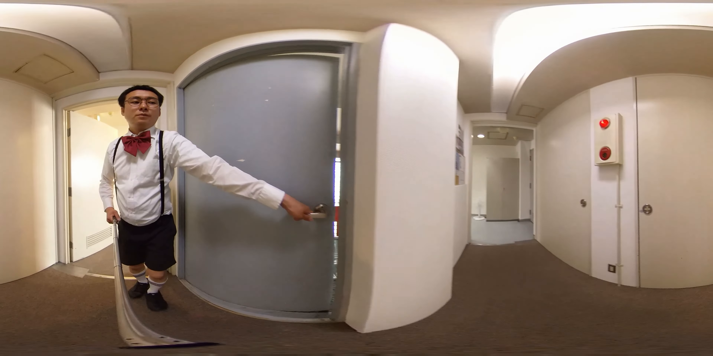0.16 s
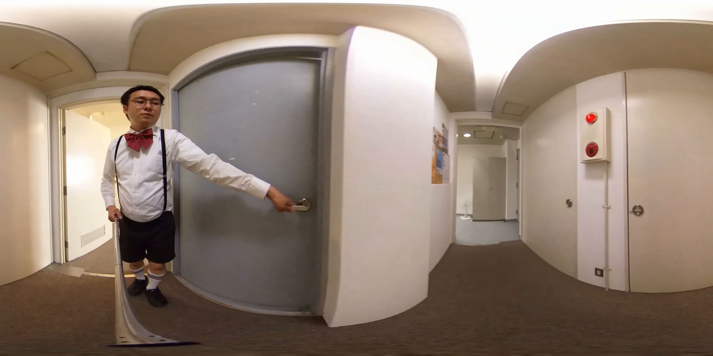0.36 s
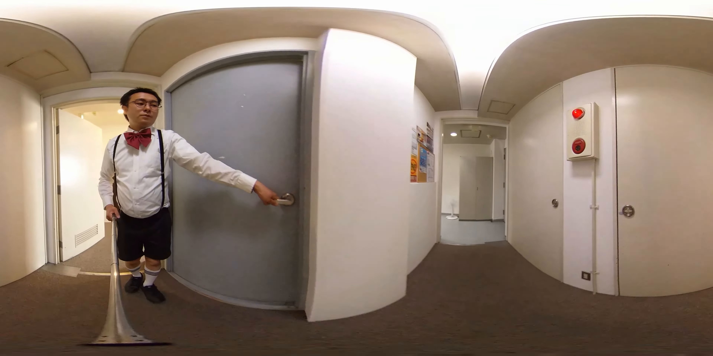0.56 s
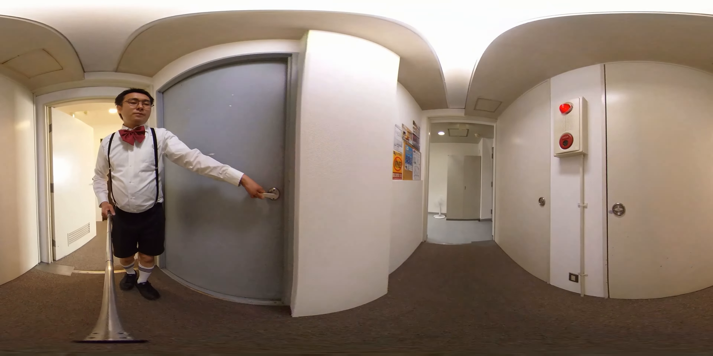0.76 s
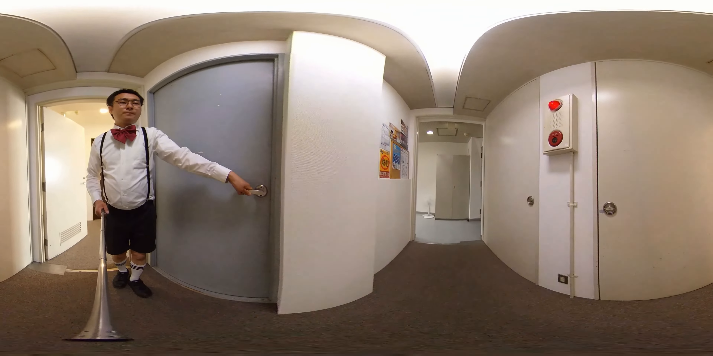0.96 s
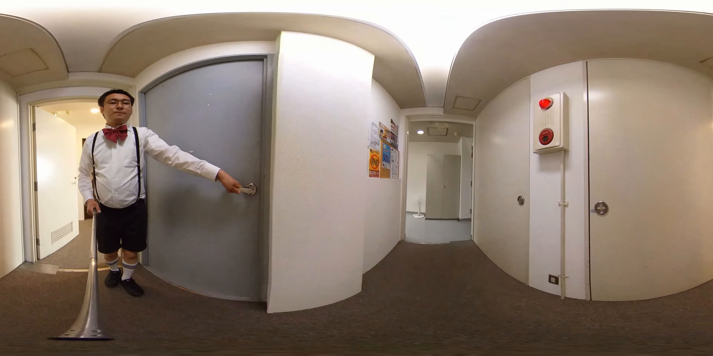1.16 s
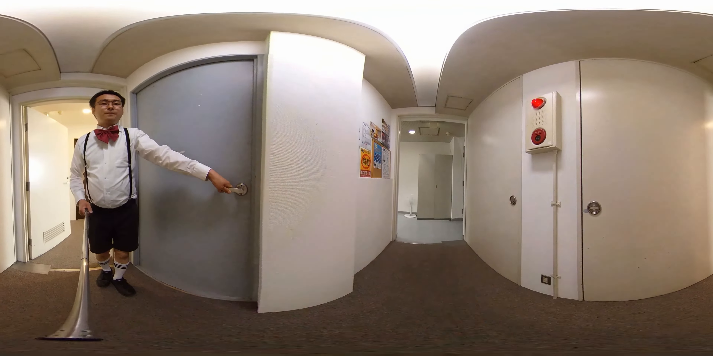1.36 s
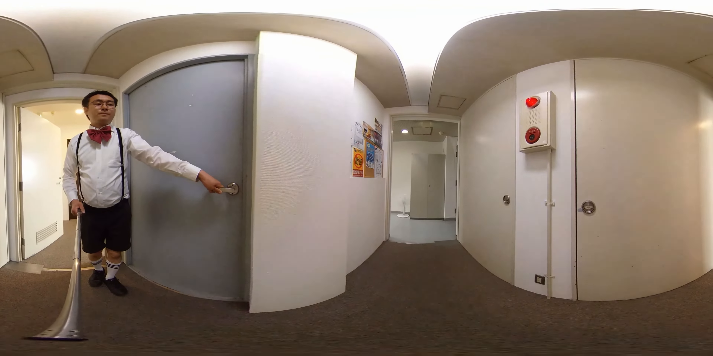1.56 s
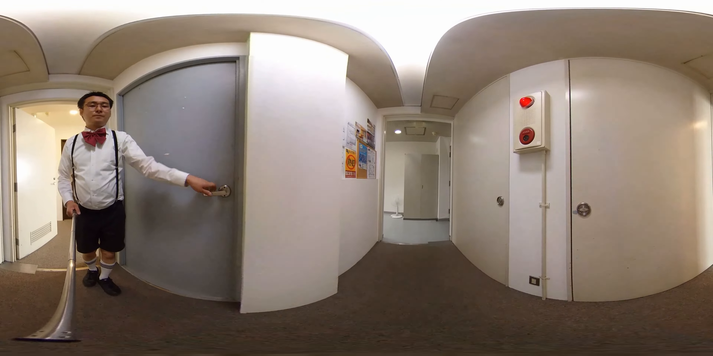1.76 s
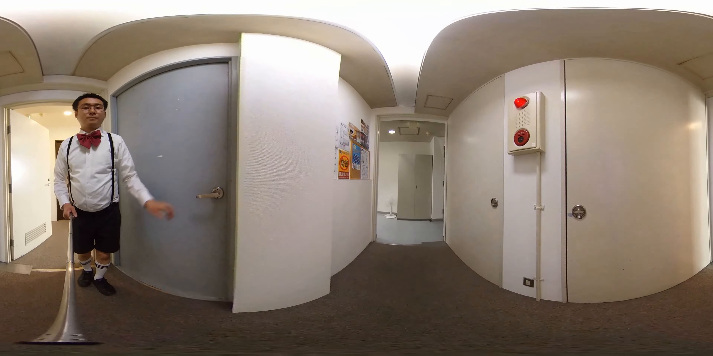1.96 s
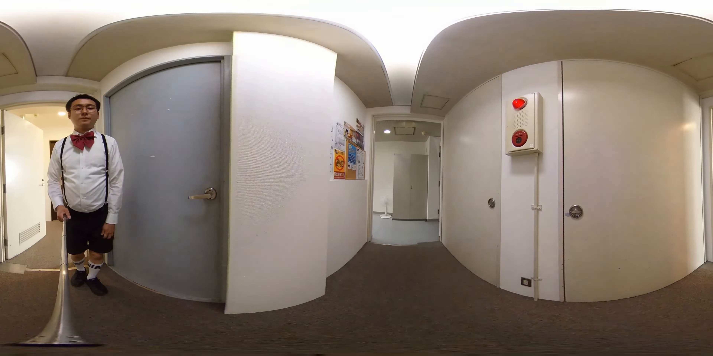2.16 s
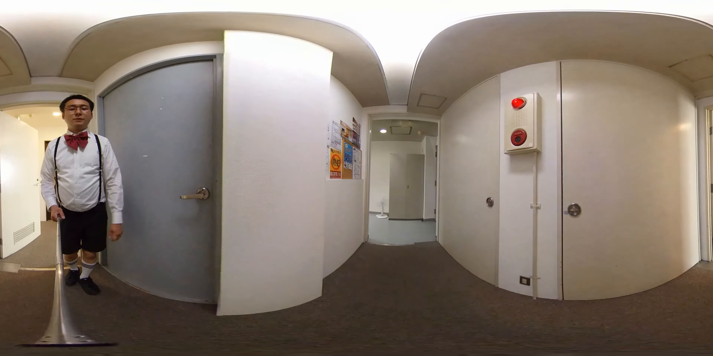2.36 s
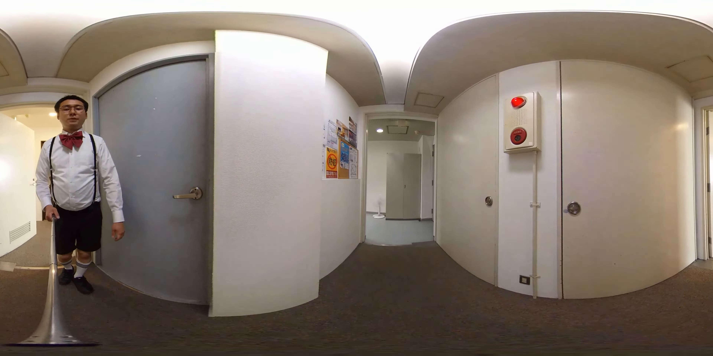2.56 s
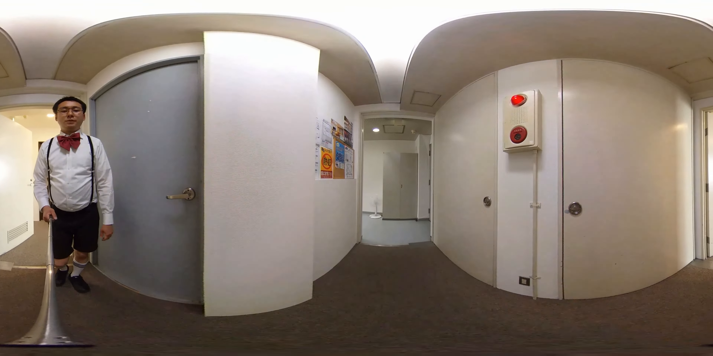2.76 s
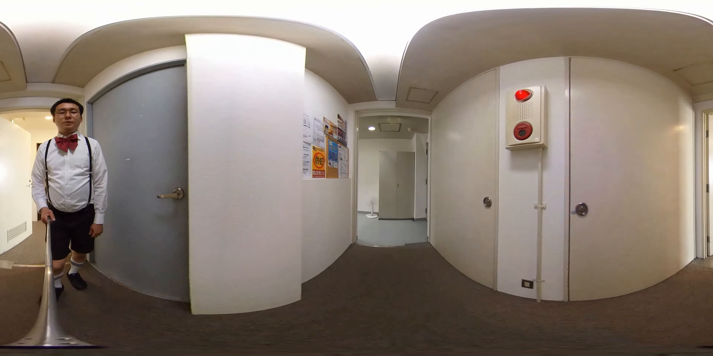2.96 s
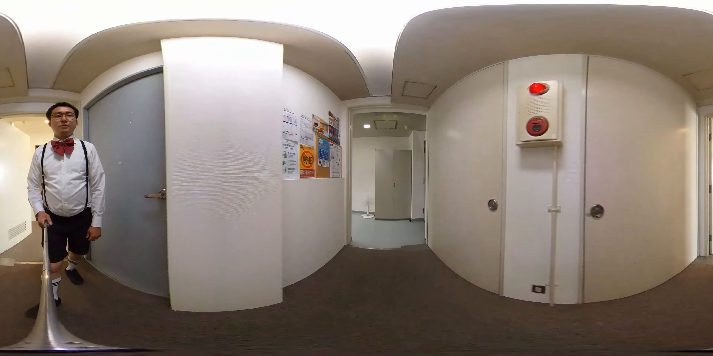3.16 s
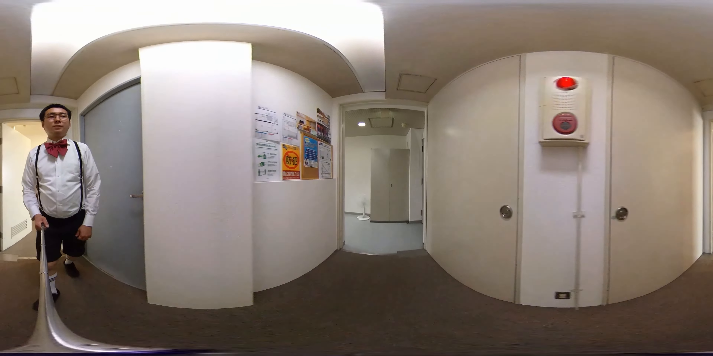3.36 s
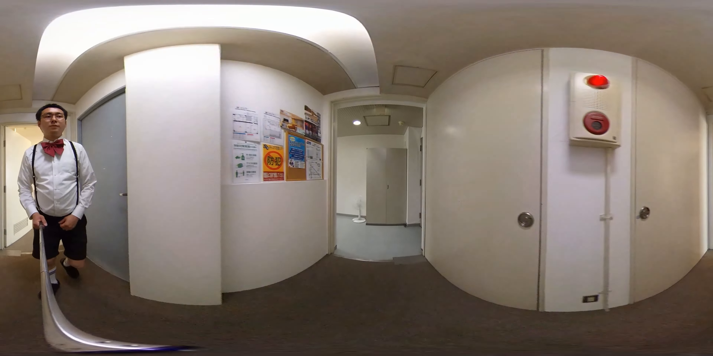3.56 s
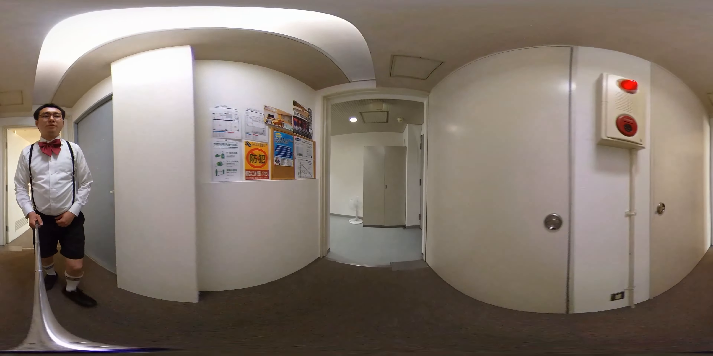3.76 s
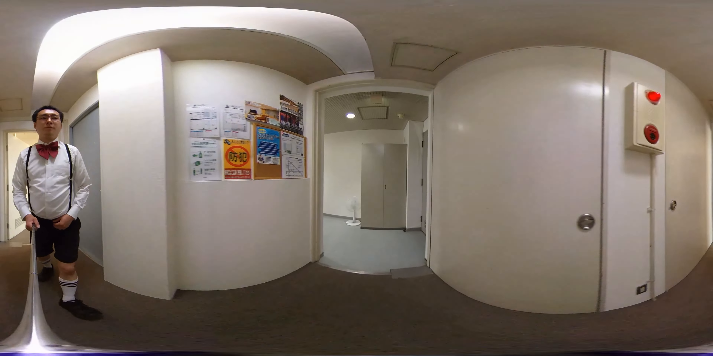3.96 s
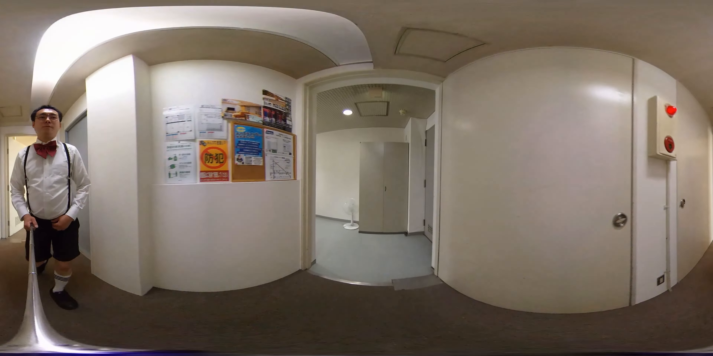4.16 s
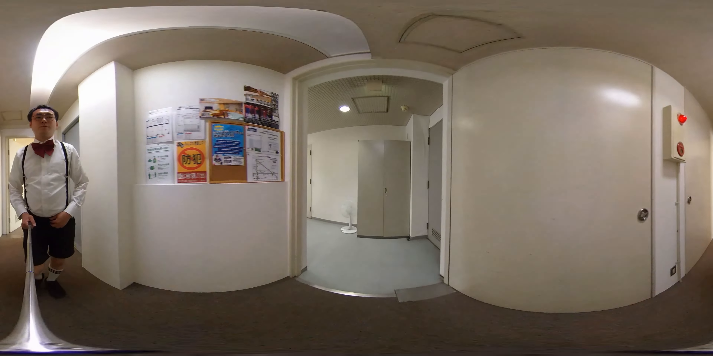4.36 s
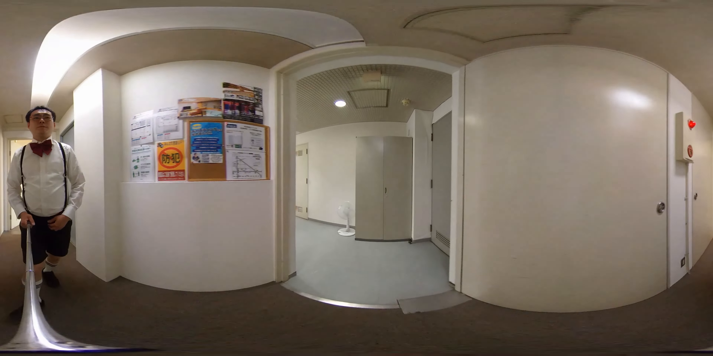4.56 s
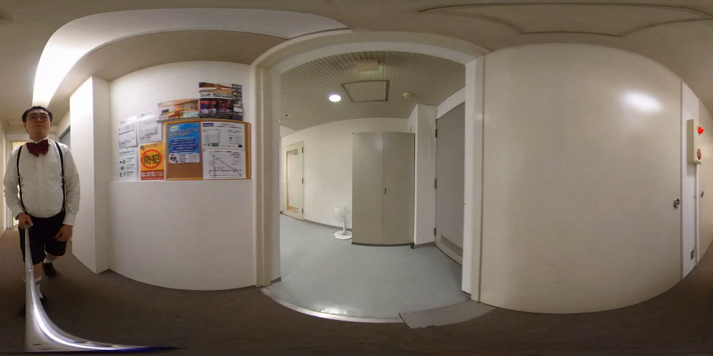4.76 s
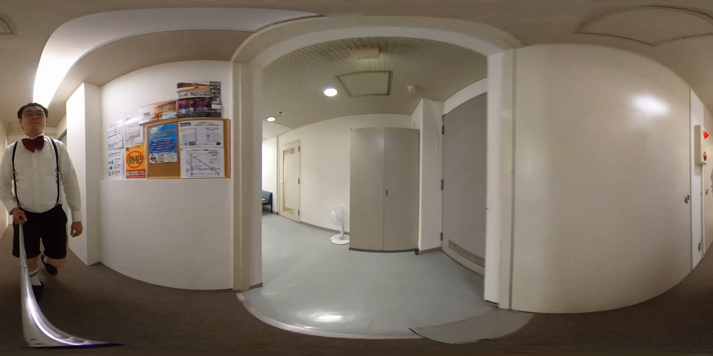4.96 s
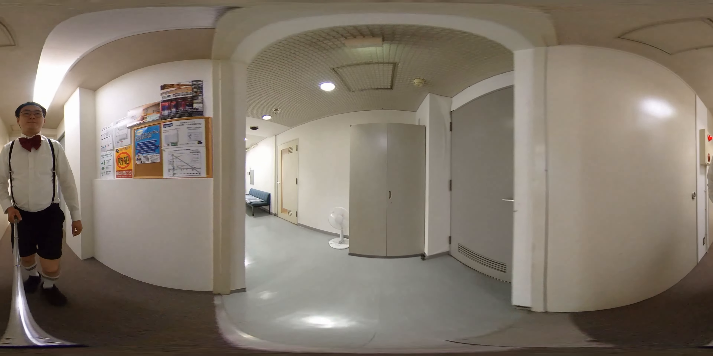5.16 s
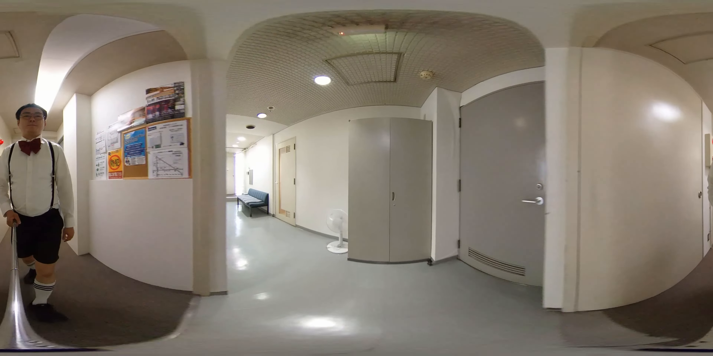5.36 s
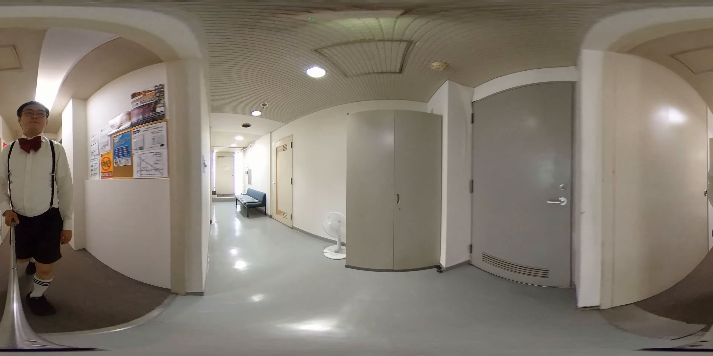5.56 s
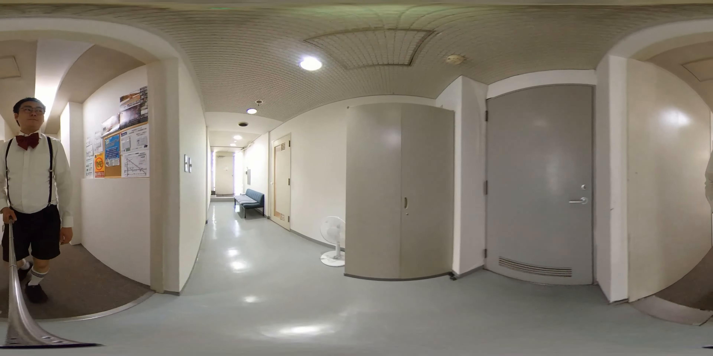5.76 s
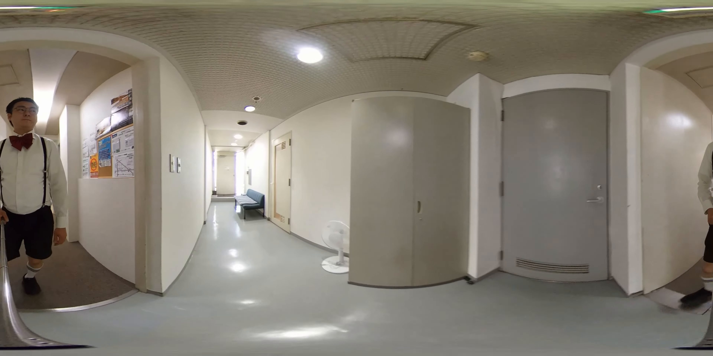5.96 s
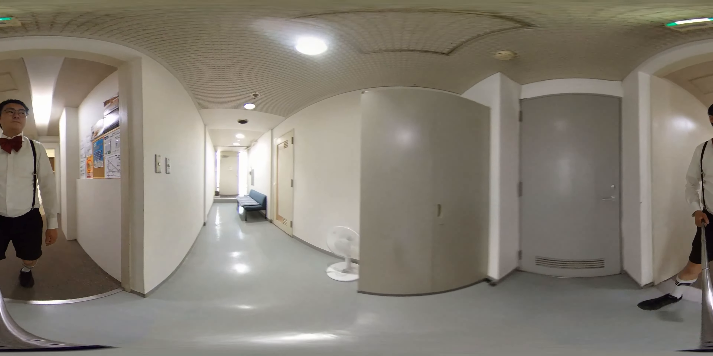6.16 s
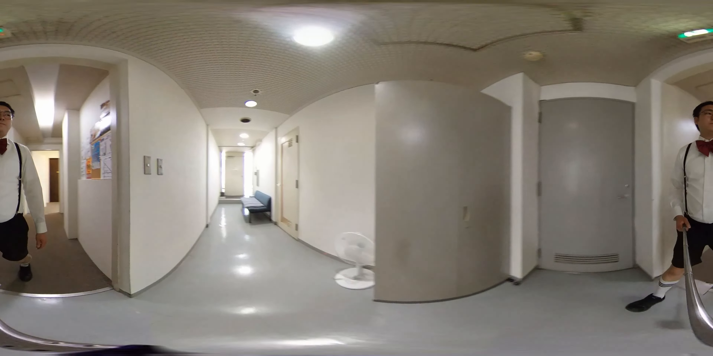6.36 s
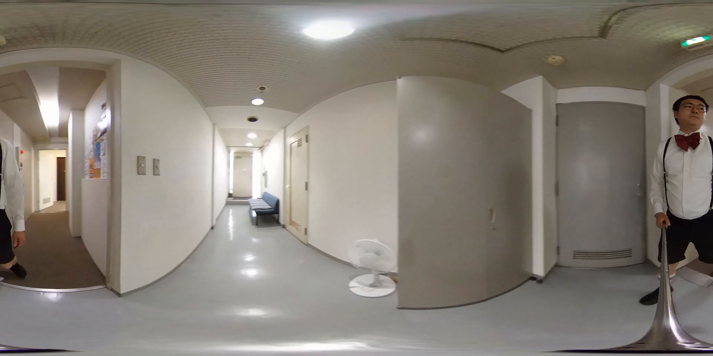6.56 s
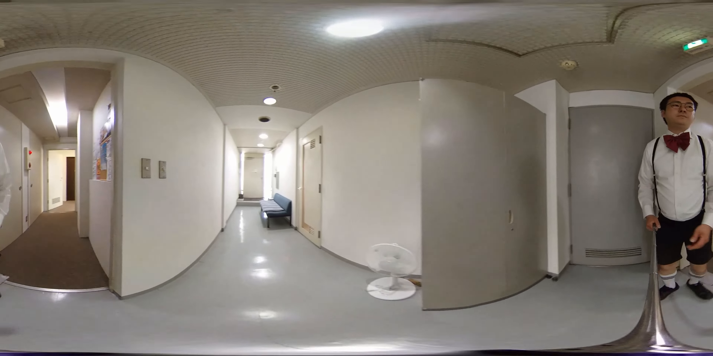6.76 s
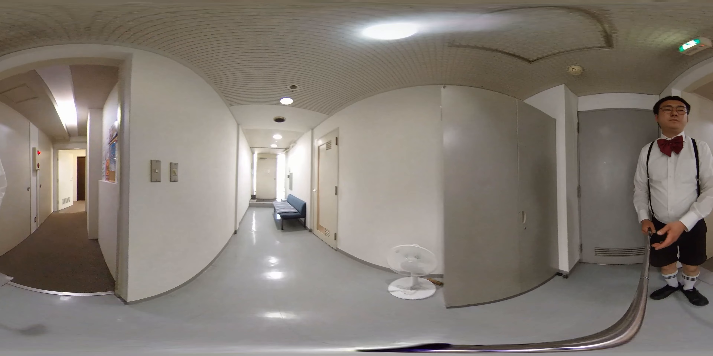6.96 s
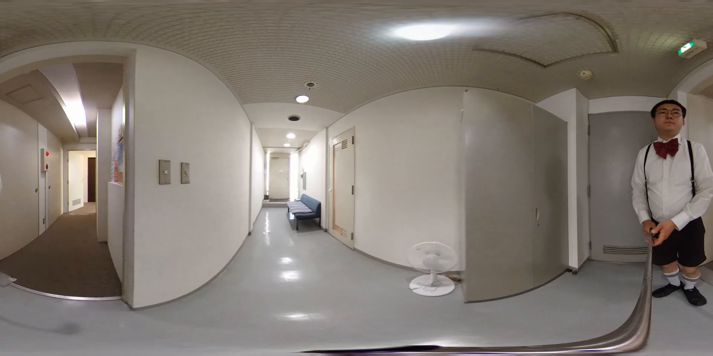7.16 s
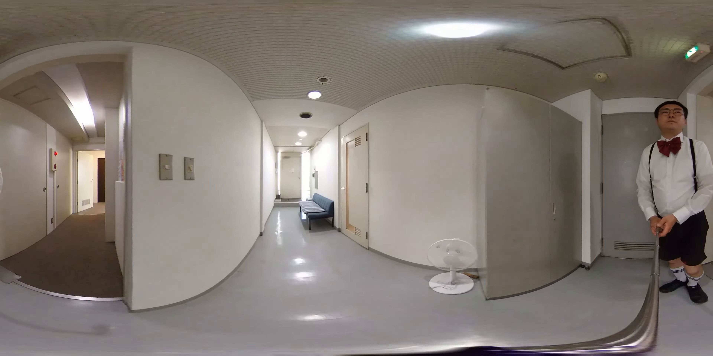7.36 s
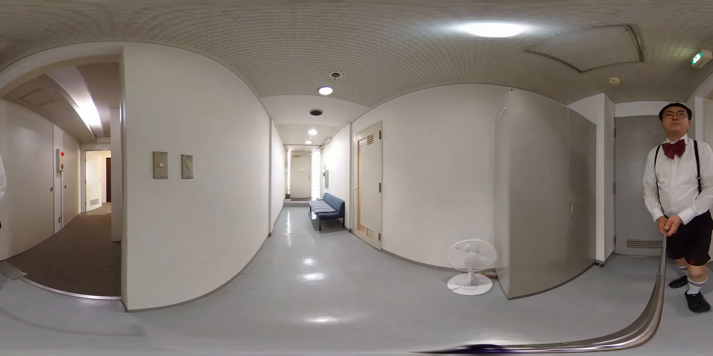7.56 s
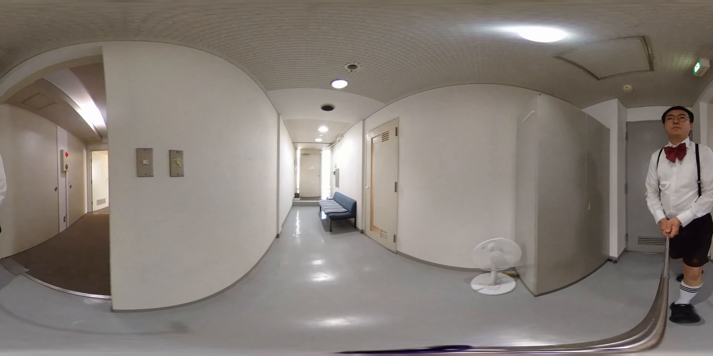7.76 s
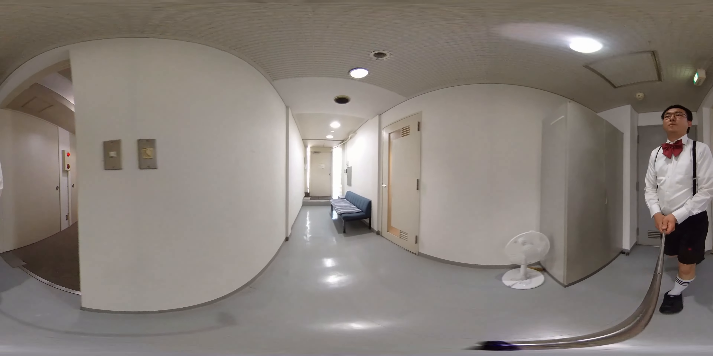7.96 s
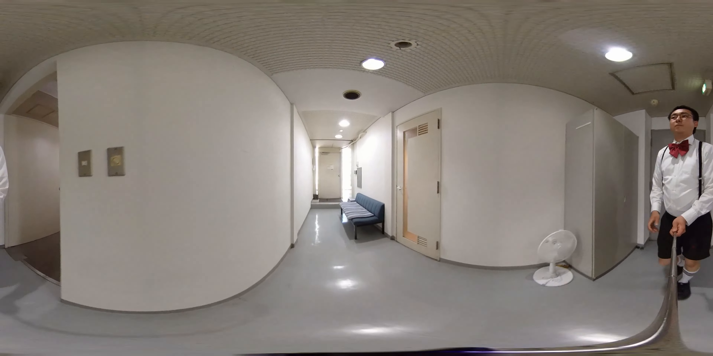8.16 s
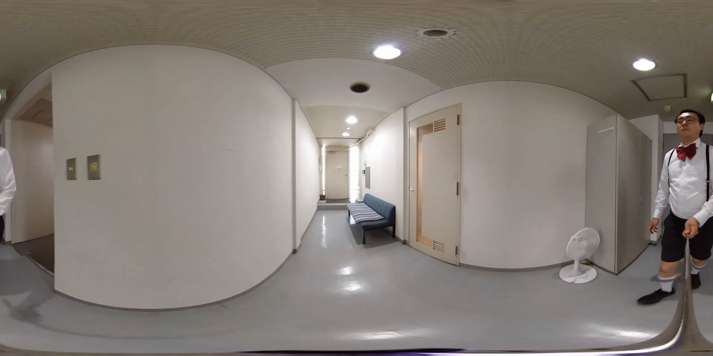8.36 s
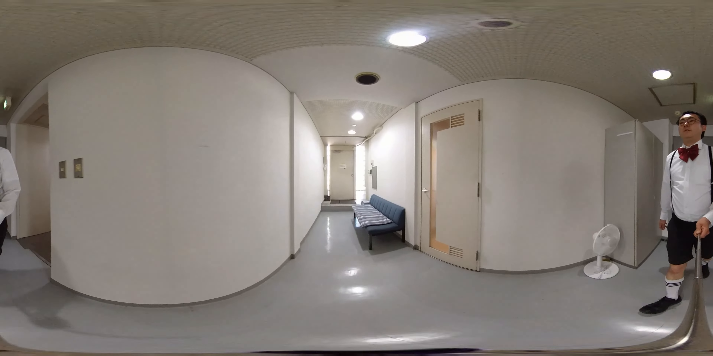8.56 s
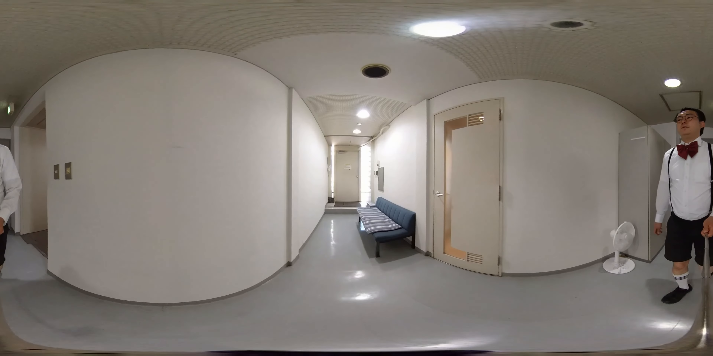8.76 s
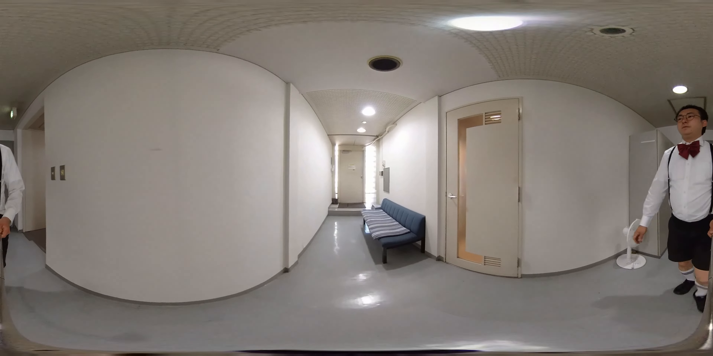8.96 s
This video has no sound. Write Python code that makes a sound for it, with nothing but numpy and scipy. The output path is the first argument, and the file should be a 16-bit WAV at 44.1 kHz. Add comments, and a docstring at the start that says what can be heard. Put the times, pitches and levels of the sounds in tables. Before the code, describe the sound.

In a hard-walled indoor corridor, faint steps and a shuffle lead to a sharp steel latch snap, then a heavier door clunk against its frame, both distorting the close microphone. The handle springs back with a duller rattle. Soft footfalls and cloth rustle follow, with one loud hollow knock on the microphone's pole late on. Steady ventilation and microphone hiss lies beneath; mono.

```python
"""A steel door is pulled shut in a hard-walled corridor: the latch snaps, the leaf meets the frame, the
handle springs back. Footfalls come before and after, and the microphone's pole knocks once. Door parts
are cracks of noise with clusters of decaying sines; steps and knock are hollow blips with noise puffs.
The corridor adds echoes and a tail; the pole carries rumble; steady ventilation and microphone hiss and
swelling shuffles lie beneath. Loud blows overload the single microphone, which feeds both channels."""
import sys
import numpy as np
from scipy import signal
from scipy.io import wavfile
from scipy.ndimage import uniform_filter1d

SR = 44100
rng = np.random.default_rng(int(sys.argv[2]) if len(sys.argv) > 2 else 0)


def master_out(mix):
    """Clip the mix to full scale and print it as 16-bit PCM to the path in sys.argv[1]."""
    frames = np.transpose(np.atleast_2d(mix))
    ceiling = np.clip(frames, -1, 1)
    pcm = np.round(ceiling * 32767).astype(np.int16)
    wavfile.write(sys.argv[1], SR, pcm)


N = 396900  # length in samples


def door():
    """Three steel parts sound in turn, each with its own blows and ringing modes."""
    # blows on each part: [t/s, peak level/dB, brightness/(dB per octave)]
    latch_blows = [(.9943, -4, 2), (.9965, 0.5, 2), (.9995, 0.7, 0.5), (1.0045, -11, 1), (1.0135, -4.5, -2),
                   (1.025, -15, 8), (1.0345, -13, -1.5), (1.0445, -19, 2)]
    leaf_blows = [(1.2787, -3, 7.5), (1.2812, -4, 2), (1.2842, 1.5, 2.3), (1.2895, -13, 12),
                  (1.2935, 3, 6.5), (1.3003, -0.5, -2), (1.308, -4.5, 0), (1.3145, -12, 15),
                  (1.3218, -10.5, -5.5)]
    handle_blows = [(1.8105, -18, -7), (1.8255, -25, 4), (1.8315, -11, -6), (1.8395, -20, 5),
                    (1.8445, -22, 4), (1.8528, -6.5, -2), (1.862, -24, 10), (1.875, -28, -7),
                    (1.89, -19, -4)]
    # ringing modes of each part: [f/Hz, relative level/dB, 60 dB decay time/s]
    latch_modes = [(723, -9.5, 0.039), (964, -8, .03), (1170, 0, 0.038), (1324, 1.5, 0.03),
                   (1610, 6.5, 0.014), (1720, -9, 0.023), (2070, -15, 0.032), (3160, -6.5, 0.023),
                   (3370, -13.5, 0.044), (4030, -30, .03), (4730, -16, 0.047), (5160, -16, .025),
                   (6300, -27, .03), (9100, -19, .02), (9870, -20, 0.016), (12300, -22, .015)]
    leaf_modes = [(354, -11, 0.05), (708, -17.5, .06), (817, -8, 0.097), (1110, -8, 0.039),
                  (1192, 4, 0.059), (1270, -11, 0.031), (1633, -5.5, 0.044), (2080, -8.5, 0.033),
                  (2590, -15, .04), (3050, -20, 0.032), (3580, -13.5, 0.042), (4480, -14.5, 0.033),
                  (5820, -21, 0.026), (9850, -30, 0.068), (12500, -21, 0.018)]
    handle_modes = [(330, -3.5, 0.066), (480, -7, 0.024), (675, 0.5, 0.048), (830, -2, 0.1),
                    (1190, -3.5, 0.034), (1690, -5, 0.035), (2290, -12.5, 0.022), (4970, -27, .02),
                    (10000, -22, .012)]

    latch = struck(latch_blows, latch_modes, crack_db=1.5, spread=0.044, contact_s=0.0013)
    leaf = struck(leaf_blows, leaf_modes, crack_db=-1.3, spread=0.0427, contact_s=0.0013)
    handle = struck(handle_blows, handle_modes, crack_db=-12, spread=0.072, contact_s=0.0012)
    return latch + leaf + handle


def struck(blows, modes, crack_db, spread, contact_s):
    """Each blow cracks briefly and rings a cluster of close modes around each pitch of one part."""
    out = np.zeros(N)
    t = np.arange(SR // 8) / SR
    cluster = 4  # close modes per pitch
    hz, mode_db, t60 = np.repeat(modes, cluster, axis=0).T[:, :, None]
    places = np.tile(np.linspace(-1, 1, cluster), len(modes))[:, None]
    hz = hz * (1 + spread * (places + 0.28 * rng.standard_normal(hz.shape)))
    for s, peak_db, bright_db in blows:
        reach_db = 3 * rng.standard_normal(hz.shape)  # each blow lands on another spot
        level_db = mode_db + reach_db + bright_db * np.log2(hz / 1000) - 60 * t / t60
        phase = 2 * np.pi * (hz * t + 0.4 * rng.random(hz.shape))
        ring = (gain_of(level_db) * np.sin(phase)).sum(0)
        soft_onset = 1 - np.exp(-t / contact_s)
        grit = signal.lfilter([.4], [1, -.6], rng.standard_normal(len(t)))  # darkened noise
        # a brighter blow has a louder crack; every crack dies 60 dB in 26 ms
        crack = gain_of(crack_db + 2.63 * bright_db - 60 * t / 0.026) * grit
        add(out, s, ring * soft_onset + crack, peak_db)
    return out


def knock():
    """A few hollow cycles, at once damped by the hand, with a dull body and overtones."""
    # the pole's one knock: t/s, length/s
    s, length = (6.9665, .0064)
    # body and overtones: [f/Hz, band edge factor, length/s, level against the knock/dB]
    knock_puffs = [(342, 1.03, 0.0079, -12.5), (880, 1.34, 0.0028, -9.5), (1190, 1.03, 0.0068, -16),
                   (1660, 1.06, 0.01, -18.5)]
    knock_db, knock_hz = -0.3, 698

    out = np.zeros(N)
    add(out, s, blip(knock_hz, length), knock_db)
    for hz, width, lasting, db in knock_puffs:
        add(out, s, puff(hz, width, lasting), knock_db + db)
    return out


def walker():
    """Footfalls and bumps: a hollow blip inside a wider scuff, over the thud of the heel."""
    # soft footfalls and small bumps: [t/s, reference level/dB, blip f/Hz]
    steps = [(0.035, -28, 1280), (0.218, -23, 1150), (0.236, -20, 820), (2.227, -21, 647),
             (3.517, -19.5, 806), (4.262, -25, 725), (4.335, -27, 1190), (4.986, -25, 700),
             (5.021, -23, 726), (5.729, -20, 648), (6.424, -17.5, 430), (6.466, -26, 1070),
             (7.963, -20, 755), (8.602, -24, 630), (8.712, -21, 690), (8.775, -22.5, 729),
             (8.822, -28, 714)]
    step_s = 0.0071

    out = np.zeros(N)
    for s, db, hz in steps:
        hollow = blip(hz, step_s)
        scuff = puff(1.13 * hz, 1.6, step_s)
        thud = puff(370, 1.48, 2 * step_s)
        add(out, s, hollow, db - 5)
        add(out, s, scuff, db - 3.0)
        add(out, s, thud, db - 11.5)
    return out


def ticks():
    """Tiny hard contacts, heard dry, without echo or tail."""
    # high ticks: [t/s, peak level/dB, centre f/Hz]
    tick_list = [(1.8255, -28, 5000), (1.8395, -18, 9800), (2.423, -19, 13000), (6.9685, -26, 3300),
                 (8.481, -22, 13000)]
    out = np.zeros(N)
    for s, db, hz in tick_list:
        add(out, s, puff(hz, 1.3, 0.0042), db)
    return out


def blip(hz, length):
    """A few hollow cycles under one smooth hump."""
    t = np.arange(0, length, 1 / SR)
    hump = np.sin(np.pi * t / length) ** 1.26
    return hump * -np.sin(2 * np.pi * hz * t)


def puff(hz, width, length):
    """A short burst of noise around one pitch, quick to rise, slower to fade."""
    t = np.arange(SR // 8) / SR
    u = t / max(length, .001)
    band = signal.butter(2, [hz / width, min(hz * width, 20000)], "bandpass", fs=SR)
    hump = np.sqrt(u) * np.exp(-2 * u)
    return signal.lfilter(*band, rng.standard_normal(len(t))) * hump


def corridor(x, echo_db, tail_db):
    """Single echoes from the near walls, then sparse taps that die at a speed of their own in each band."""
    # reverberation of the hard walls: [f/Hz, 60 dB decay time/s]
    decay_times = [(150, 0.38), (700, 0.52), (1200, 0.39), (1700, 0.32), (2500, 0.36), (5000, 0.31),
                   (10000, 0.17)]
    # near walls: [delay/s, level before the echo_db offset/dB]
    echoes = [(.0068, -17), (.0138, -6.5), (.020, -5.5), (.026, -25), (.032, -26), (.038, -7.5)]

    taps = np.zeros(SR // 2)
    spacing = 20  # samples; one tap falls at random in each slot
    at = np.arange(300, len(taps) - spacing, spacing)
    taps[at + rng.integers(0, spacing, len(at))] = rng.choice([-1., 1.], len(at))
    hz, t, z = signal.stft(taps, SR, nperseg=256)
    decay = gain_of(-60 * t / read(decay_times, hz)[:, None])
    response = signal.istft(z * decay, SR, nperseg=256)[1]
    response *= gain_of(tail_db) / np.linalg.norm(response)
    response[0] += 1  # direct sound
    for s, db in echoes:
        response[round(s * SR)] += gain_of(db + echo_db)
    return signal.fftconvolve(x, response)[:N]


def capsule(x):
    """The small microphone loses the bass of airborne sound and dips in the treble; causal."""
    # response to airborne sound: [f/Hz, level/dB]
    response = [(20, -56), (200, -41), (350, -11), (500, -4), (650, 1.8), (5500, 1), (6700, -8),
                (8500, -3.5), (15500, -5.5)]
    log_gain = np.log(gain_of(read(response, abs(np.fft.fftfreq(4096, 1 / SR)))))
    # the Hilbert transform supplies the minimum phase
    taps = np.fft.ifft(np.exp(np.conj(signal.hilbert(log_gain)))).real[:2048]
    return signal.oaconvolve(x, taps)[:N]


def pole():
    """Rumble, thumps and jolts reach the microphone through the pole, past the corridor and capsule."""
    # colour of the rubbing: [f/Hz, relative level per Hz/dB]
    rumble = [(15, -69), (25, -41), (70, -22.5), (144, -10.5), (246, 1), (337, -4.5), (399, -3.5),
              (450, -11), (580, -40), (990, -120)]
    # blows felt through the pole: [t/s, thump peak/dB, thump f/Hz, jolt peak/dB]
    thumps = [(1.042, -21.5, 280, -42), (1.311, -23.5, 246, -38), (1.831, -26.5, 260, -38),
              (6.964, -31, 246, -42)]
    jolt_s = .007

    out = grip() * noise(lambda hz: read(rumble, hz), patchy_db=1.56)
    for s, thump_db, hz, jolt_db in thumps:
        add(out, s, puff(hz, 1.4, 0.013), thump_db)
        add(out, s, np.hanning(round(jolt_s * SR)), jolt_db)  # one-sided push
    return out


def grip():
    """How hard the hand rubs the pole: a faint tremor, and shifts that rise, hold and die away."""
    # the hand shifts on the pole: [start t/s, length/s, held level/dB]
    shifts = [(0.202, 0.031, -43), (0.278, 0.2, -48.5), (0.62, 0.04, -56), (0.783, 0.35, -48.5),
              (1.226, .05, -49), (1.377, 0.16, -44.5), (1.63, .03, -63), (2.766, 0.056, -63),
              (3.393, .04, -65), (3.89, 0.072, -64), (4.234, 0.043, -52), (4.375, 0.29, -44.5),
              (4.76, 0.11, -47), (4.96, .03, -62), (5.157, 0.26, -63), (5.68, 0.045, -66), (6.12, .1, -59),
              (6.244, 0.028, -53), (6.623, 0.047, -57), (8.063, .03, -52), (8.13, 0.044, -50),
              (8.205, 0.26, -52), (8.528, 0.032, -47)]
    rise_s, fall_db_per_s = 0.025, 252
    # the holding hand is never quite still: middle level, rms swing, smoothing window
    tremor_db, tremor_swing_db, tremor_s = -72.5, 6.5, 0.046

    control_rate = 1000  # Hz
    t = np.arange(0, N / SR, 1 / control_rate)
    span = max(round(tremor_s * control_rate), 1)
    wander = uniform_filter1d(rng.standard_normal(len(t)), span)
    tremor = evened(uniform_filter1d(wander, span))
    level = gain_of(tremor_db + tremor_swing_db * tremor)
    for s, length, db in shifts:
        rise = np.clip((t - s) / rise_s, 0, 1) ** 2
        fall_db = fall_db_per_s * np.maximum(t - s - length, 0)
        level = level + rise * gain_of(db - fall_db)
    return np.interp(np.arange(N) / SR, t, level)


def background():
    """Steady ventilation and microphone hiss, and a shuffle of shoes and cloth that swells with movement."""
    # hiss colour: [f/Hz, relative level per Hz/dB]
    hiss_colour = [(35, -70), (60, -29), (118, -63), (292, -15.5), (328, -15), (360, -10), (444, -17.5),
                   (660, -2.5), (832, -5.5), (1080, -5), (1360, -8.5), (5480, -14), (6610, -15.5),
                   (8730, -14), (15600, -22.5)]
    # humps and a dip in the hiss: [f/Hz, width/Hz, level/dB]
    ducts = [(700, 194, 4.5), (1177, 140, 4.5), (1627, 500, 4), (6640, 520, -5)]
    # shuffle colour: [f/Hz, relative level per Hz/dB]
    shuffle_colour = [(150, -60), (300, -17), (560, -15.5), (700, 4), (900, -9.5), (1200, -1),
                      (1500, -14.5), (1750, -5), (2100, -38), (3500, -52)]
    # swells of shuffling shoes and cloth: [t/s, rms level at the top/dB, half-length/s]
    swells = [(0.024, -33.5, 0.053), (0.288, -36.5, 0.087), (.7, -47, 0.13), (1.698, -37, 0.32),
              (3.448, -36.5, 0.21), (4.3, -41.5, 0.4), (4.932, -36, 0.12), (6.52, -37.5, 0.13),
              (7.935, -36, 0.051), (8.65, -41, 0.054), (8.828, -34, 0.11)]
    hiss_db = -32.5  # rms

    def humps(hz):
        return sum(db * np.exp(-((hz - f) / width) ** 2) for f, width, db in ducts)

    t = np.arange(N) / SR
    hiss = gain_of(hiss_db) * noise(lambda hz: read(hiss_colour, hz) + humps(hz), patchy_db=0.5)
    swell = sum(gain_of(db) * np.exp(-((t - s) / half) ** 2) for s, db, half in swells)
    shuffle = swell * noise(lambda hz: read(shuffle_colour, hz), patchy_db=2.1)
    return hiss + shuffle


def noise(colour_db, patchy_db):
    """Steady noise of a given colour, with small louder and softer patches in time and pitch."""
    hz = np.fft.rfftfreq(1024, 1 / SR)
    a, b, patches = rng.standard_normal((N // 256 + 5, 513, 3)).T
    patches = uniform_filter1d(patches, size=10, axis=0)  # across pitch
    patches = evened(uniform_filter1d(patches, size=12, axis=1))  # across time
    z = (a + 1j * b) * gain_of(colour_db(hz)[:, None] + patchy_db * patches)
    return evened(signal.istft(z, nperseg=1024, noverlap=768)[1][:N])


def add(mix, s, sound, db):
    """Mixes a sound in at time s with the given peak."""
    part = mix[round(s * SR):][:len(sound)]
    part += gain_of(db) * sound[:len(part)] / abs(sound).max()


def read(points, hz):
    """Reads a table of values against pitch on a log-frequency axis."""
    f, value = np.transpose(points)
    return np.interp(np.log(hz + 1), np.log(f + 1), value)


def evened(x):
    """Scales to rms 1."""
    return x / np.sqrt(np.mean(x ** 2) + 1e-20)


def gain_of(db):
    """Decibels to a factor."""
    return 10 ** (np.asarray(db) / 20)


def scene():
    """Airborne sounds pass the capsule, hiss, shuffle and pole join; one microphone feeds both channels."""
    air = corridor(door(), echo_db=-31, tail_db=-6.0)
    air += corridor(knock(), echo_db=-7.0, tail_db=-7.5)
    air += corridor(walker(), echo_db=-7, tail_db=-5)
    air += ticks()
    mono = capsule(air) + background() + pole()
    return np.array([mono, mono])


def record(dry):
    """The band limit follows a hard overload at full scale."""
    edge_hz = 15720
    overloaded = np.clip(dry, -1, 1)
    taps = signal.firwin(511, edge_hz, window=("kaiser", 9), fs=SR)
    return signal.oaconvolve(overloaded, taps[None], "same")


dry = scene()
out = record(dry)
master_out(out)
```